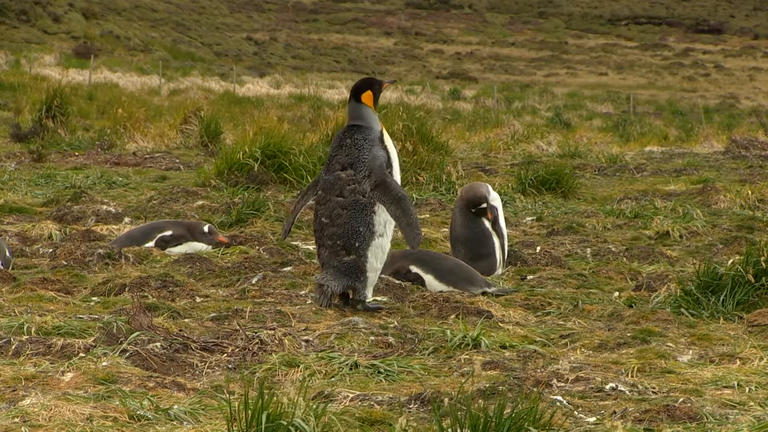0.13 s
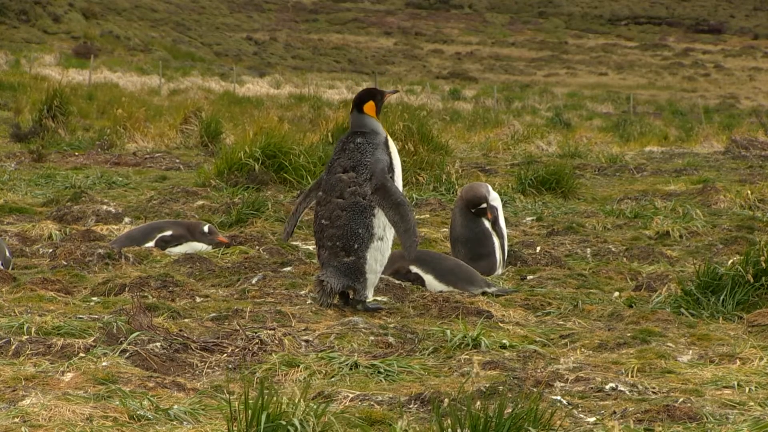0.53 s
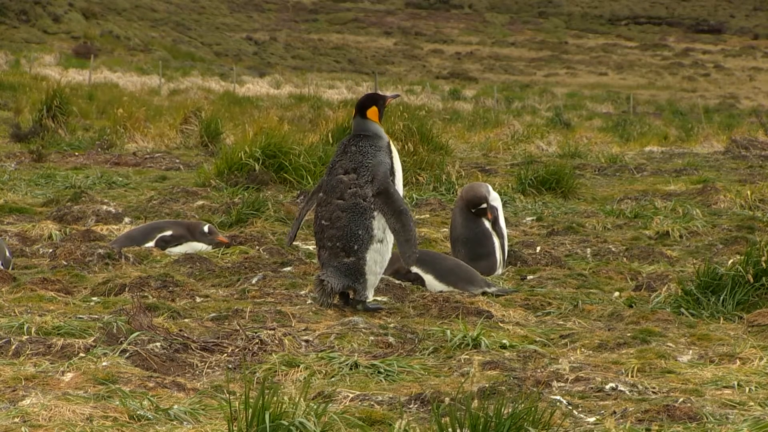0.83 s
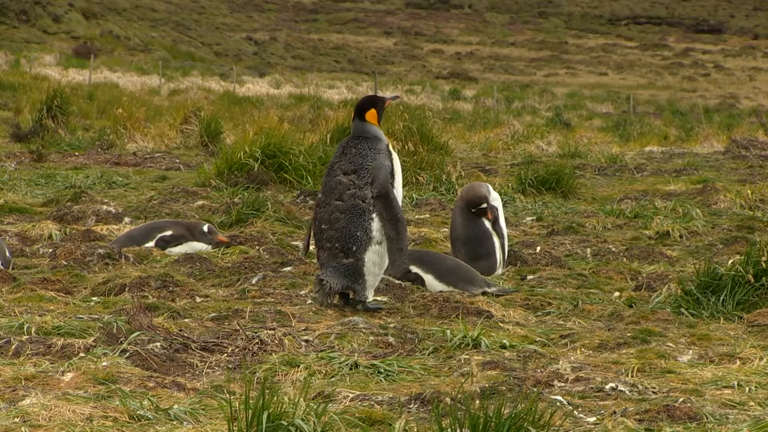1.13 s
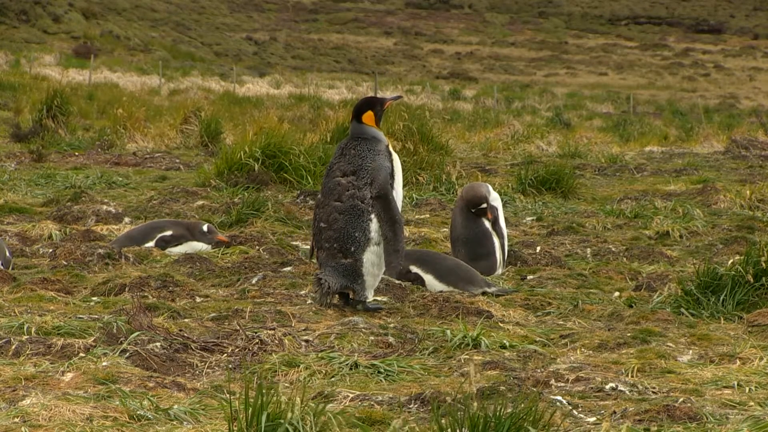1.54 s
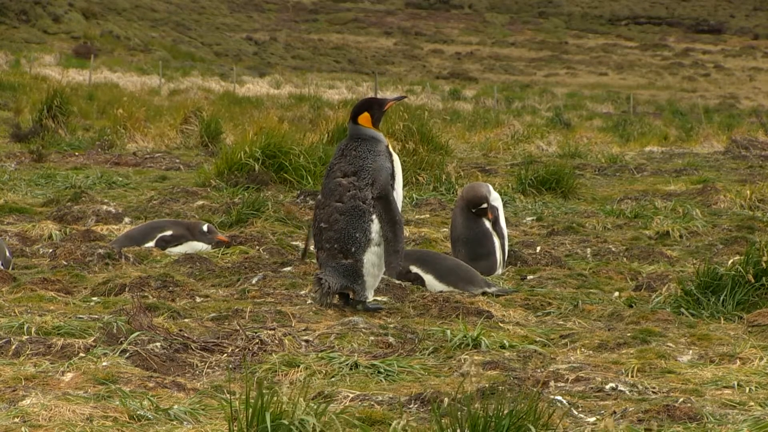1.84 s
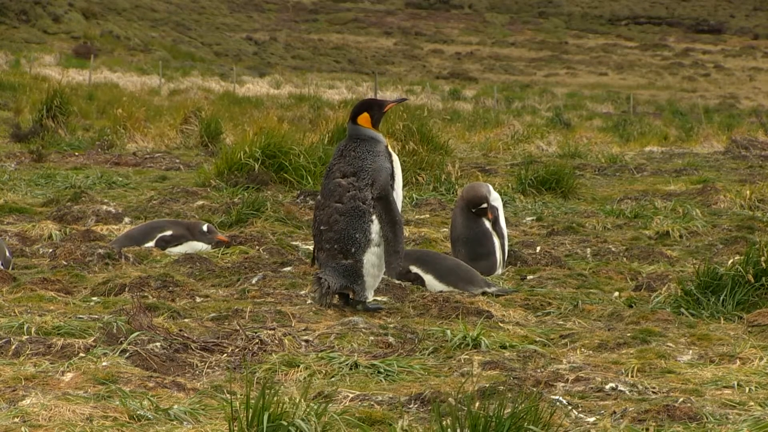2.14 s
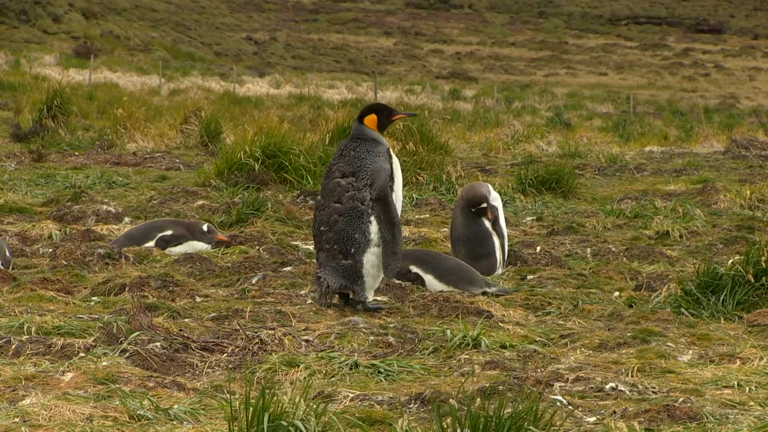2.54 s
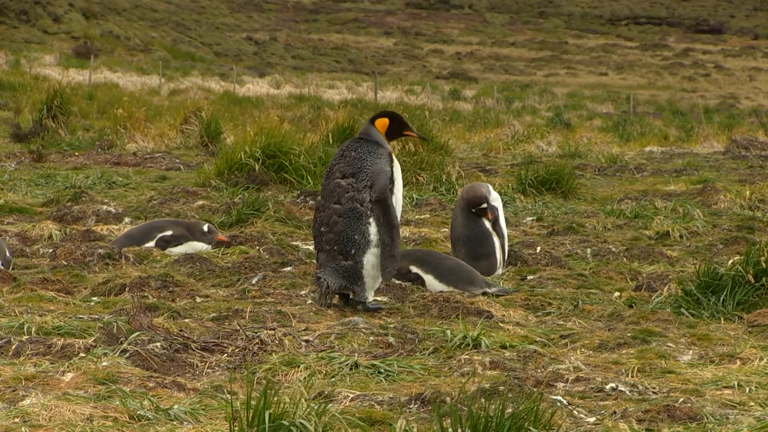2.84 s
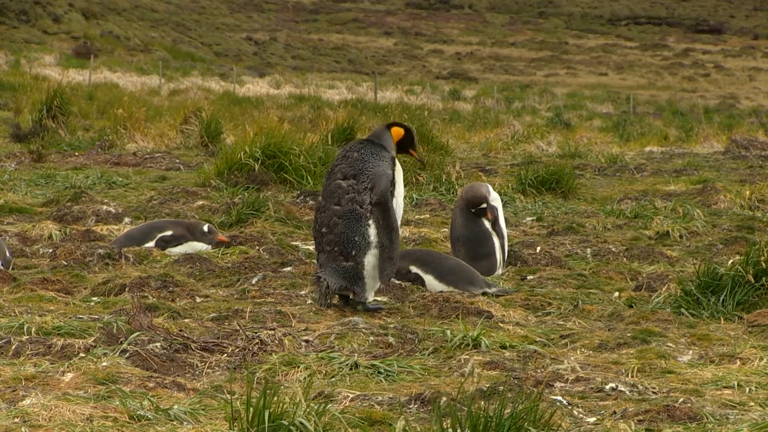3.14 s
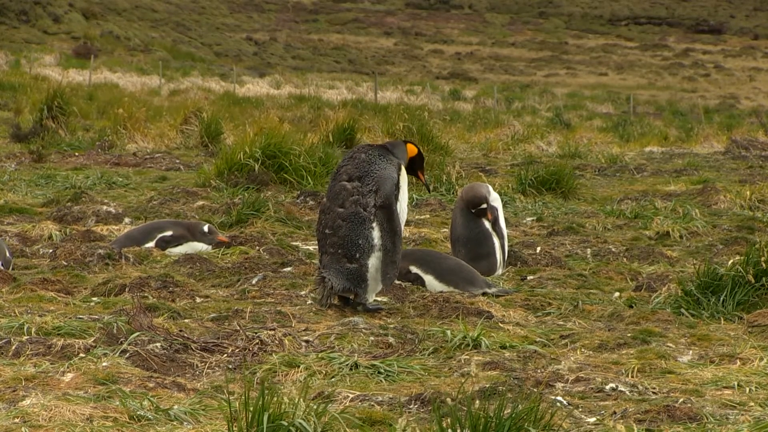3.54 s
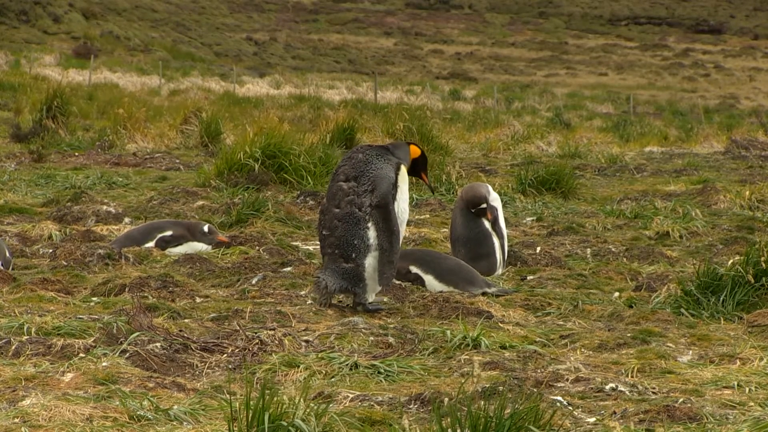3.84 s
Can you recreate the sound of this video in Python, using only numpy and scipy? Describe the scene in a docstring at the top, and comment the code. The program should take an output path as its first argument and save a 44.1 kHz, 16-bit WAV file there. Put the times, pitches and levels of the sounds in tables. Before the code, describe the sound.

A penguin colony outdoors: strong buzzing brays first, then weaker overlapping ones, with squeaky chicks and gliding chirps mostly to the right; low wind swells mid-way and later, bumping the stereo microphones, with almost no echo.

```python
"""Penguins bray in rough, throbbing pulses to the left and right, in a colony on open grassland.
Each bray is a train of pulses and puffs of air coloured by a throat; chicks squawk in stacked partials.
Whistles are gliding tones, croaks are short pulsing tones, and all the voices leave a short noisy tail.
Shaped noise makes the murmur of the far colony, an airy hiss and the wind rumbling in two microphones;
sharp gusts add quick pressure dips."""
import sys
import numpy as np
from scipy import signal
from scipy.fft import rfft, irfft, next_fast_len
from scipy.io import wavfile
from scipy.ndimage import uniform_filter1d

SR = 44100
rng = np.random.default_rng(int(sys.argv[2]) if len(sys.argv) > 2 else 0)


def file_out(sig):
    """Save sig as 16-bit WAV at sys.argv[1]."""
    # one column per channel
    cols = np.atleast_2d(sig).T
    # limit, then scale
    lim = np.clip(cols, -1, 1)
    pcm = np.round(lim * 32767).astype(np.int16)
    wavfile.write(sys.argv[1], SR, pcm)


N = 176400  # samples, 4 s

# Airy hiss, its spectrum before the overall level is set: tone_hz, relative_level_db
HISS_SPECTRUM = [(3000, -9.5), (6000, 2), (8000, -2.5), (10000, -4), (12000, -5.5)]
HISS_DB, HISS_PATCH_DB = -85, 0.87

# Wind strength over time: time_s, level_db (before WIND_LIFT_DB), left_minus_right_db
WIND_STRENGTH = [(0.0, -39.5, 4), (0.169, -44, -0.5), (0.34, -40.5, -0.5), (0.42, -46.5, 5.5),
                 (0.769, -45.5, -6.5), (1.248, -55, 4), (1.48, -50, 11), (1.56, -51.5, -10.5),
                 (1.59, -45, 11.5), (1.68, -38, -2.5), (1.75, -29, 5), (1.79, -38.5, 2.5), (1.83, -35, 1),
                 (1.869, -28.5, 9.5), (1.89, -35, 3.5), (1.978, -29, -1), (2.02, -41, 13.5),
                 (2.101, -60, -5.5), (2.149, -43, 0.5), (2.48, -47.5, -2.5), (2.74, -46, -2),
                 (2.81, -43.5, 3), (2.871, -26, 3.5), (2.909, -41, 1), (3.09, -39, 2.3), (3.22, -44.5, -4),
                 (3.275, -37, 0.3), (3.37, -36.5, -2.5), (3.42, -47, -3), (3.47, -37.5, -4.5),
                 (3.58, -42, -5.5), (3.66, -35.5, 2.5), (3.77, -36, -4), (3.878, -44, 2.5), (4.0, -37, -4)]
# Spectrum of moderate wind, before the level is set: tone_hz, relative_level_db
WIND_SPECTRUM = [(20, -36.5), (32, -21.5), (45, -18), (75, 0.5), (110, 1.5), (200, -6.5), (270, -16),
                 (400, -22), (550, -31.5), (800, -44.5), (1500, -60), (3000, -100)]
WIND_LIFT_DB, WIND_LUMP_DB, WIND_PATCH_DB = 3.5, 3.5, 1.5
# each dB of wind above CALM_DB tilts the spectrum by BRIGHTEN dB per octave around KNEE_HZ
CALM_DB, BRIGHTEN, KNEE_HZ = -42, 0.2, 134

# Sharp gusts: time_s (before BUFFET_LATE_S), peak_db (before BUFFET_TRIM_DB), left_minus_right_db
BUFFET_TIMES = [(1.731, -26, 4), (1.856, -12, 14.5), (1.942, -20, 5), (1.979, -19.5, -5), (2.144, -34, -11),
                (2.861, -28, -0.5), (3.62, -33.5, -3), (3.668, -26, -1)]
BUFFET_S, BUFFET_LATE_S, BUFFET_TRIM_DB = 0.001, 0.00402, -5
BUFFET_ROUND = 0.29  # rounding of the tip, in units of BUFFET_S

# Far colony, its spectrum before the overall level is set: tone_hz, relative_level_db
MURMUR_SPECTRUM = [(290, -23.5), (500, -0.5), (704, -7.5), (944, -5.5), (1050, -3), (1650, -10.5),
                   (2070, -9), (2590, -14.5), (3340, -11), (3680, -19.5), (4180, -23.5), (5180, -28.5),
                   (6730, -47.5), (11400, -120)]
MURMUR_DB, MURMUR_PATCH_DB = -69, 3.5
MURMUR_SAME = 0.78  # likeness of the two channels, 0-1

# Tail of the voices: level, and time to fall by 60 dB
SCATTER_DB, SCATTER_T60_S = -11, 0.08

# Whistles from the left, one list per call: time_s, pitch_hz, level_db, octave_level_db
WHISTLES_ON_LEFT = [
    [(0.295, 4030, -66, -81), (0.345, 3860, -75, -85), (0.381, 4300, -72, -82), (0.419, 4320, -78, -82),
     (0.44, 3583, -79, -92.5)],
    [(0.402, 3770, -78, -99), (0.422, 3600, -71, -72), (0.48, 3550, -80, -83)],
    [(1.2, 3741, -72, -107), (1.222, 3055, -61.5, -100), (1.236, 3653, -61, -74.5),
     (1.254, 3804, -70, -120), (1.266, 3603, -63, -76), (1.288, 2880, -68, -107), (1.336, 3348, -65, -77),
     (1.35, 2830, -68, -107)],
    [(1.125, 3770, -67, -114), (1.143, 3060, -64, -104), (1.165, 3740, -88, -117)],
    [(3.29, 3202, -76, -106), (3.332, 3650, -68, -68), (3.365, 3437, -98.5, -101)],
    [(3.445, 3210, -80, -108), (3.52, 3750, -72, -72.5), (3.58, 3450, -102, -106)],
]
# Whistles from the right, one list per call: time_s, pitch_hz, level_db
WHISTLES_ON_RIGHT = [
    [(0.575, 3586, -72), (0.665, 3673, -74.5), (.73, 3625, -72.5), (.765, 3650, -79), (0.821, 3620, -74),
     (0.87, 3400, -78)],
    [(.73, 2560, -85), (.79, 2680, -84), (.83, 2826, -72.5), (.9, 2630, -67.5)],
    [(1.095, 2920, -72.5), (1.11, 3753, -72)],
    [(1.078, 3780, -77), (1.11, 3930, -69), (1.14, 3750, -74)],
    [(1.3, 3400, -76), (1.35, 3540, -78), (1.4, 3220, -78)],
    [(1.48, 3150, -84), (1.6, 3330, -92), (1.65, 3600, -73), (1.675, 3390, -75.5), (1.7, 3150, -74),
     (1.75, 2880, -68)],
    [(1.682, 3890, -75), (1.738, 3635, -65), (1.765, 3200, -64)],
    [(1.785, 3463, -66), (1.801, 3493, -63.5), (1.815, 3290, -84)],
    [(1.99, 3250, -92), (2.035, 3350, -80), (2.065, 3500, -69.5), (2.1, 3470, -83.5), (2.135, 3080, -75.5),
     (2.18, 2720, -70)],
    [(2.355, 3700, -78), (2.375, 4040, -81), (2.4, 4070, -79), (2.42, 3600, -67), (2.44, 3360, -70)],
    [(2.437, 4250, -82.5), (2.46, 3780, -73), (2.477, 4050, -77), (2.495, 3680, -76)],
    [(2.49, 3428, -72), (2.51, 3471, -81), (2.56, 3100, -70)],
    [(2.89, 3220, -86), (2.902, 3424, -69), (2.92, 3290, -78), (2.964, 3780, -64.5), (2.994, 3400, -71),
     (3.022, 4430, -68), (3.04, 4114, -79), (3.054, 3685, -65.5), (3.07, 3550, -66)],
    [(3.143, 3900, -63), (3.158, 4150, -74), (3.18, 3800, -58.5), (3.195, 3400, -67), (3.215, 3290, -64.5)],
    [(3.55, 3236, -82), (3.574, 3444, -74.5), (3.6, 3150, -74), (3.625, 3340, -71), (3.674, 3059, -76),
     (3.698, 3100, -69.5), (3.72, 2970, -81.5)],
    [(3.79, 3270, -75), (3.812, 3411, -66.5), (3.84, 3550, -77)],
]
WHISTLE_LAG, WHISTLE_EDGE_S = 3.46, 0.0016  # lag in samples, before a factor for each side
OCTAVE_DB = -23.5  # octave of the right whistles, relative to their tone
WAVER = 0.0016  # random pitch drift of whistles and squawks, as a share of pitch

# Short distant croaks from the left: start_s, level_db (before the fade in and out)
CROAK_TIMES = [(.63, -69), (0.674, -63.5), (.723, -67), (.768, -66.5)]
# The two tones of a croak, before the level is set: tone_hz, relative_level_db
CROAK_RESONANCES = [(1060, -4.5), (1980, -3)]
CROAK_S, CROAK_HZ, CROAK_LAG = 0.021, 225, -3.5  # length, pulse rate, left lag in samples

# Chick squawks from the right, one list per call: time_s, pitch_hz, level_db
SQUAWK_CALLS = [
    [(0.402, 815, -63), (0.45, 803, -63.5), (0.5, 766, -65)],
    [(0.508, 688, -65), (0.548, 656, -62), (0.572, 590, -65)],
    [(1.292, 754, -60), (1.302, 727.2, -68), (1.325, 790, -68)],
    [(3.072, 746, -60), (3.132, 708, -60.5), (3.143, 760, -79.5)],
    [(3.217, 616, -65.5), (3.247, 556, -67), (3.268, 550, -81)],
]
# Throat of a chick, before the level is set: tone_hz, relative_level_db
CHICK_THROAT = [(1120, -57), (1800, -42), (2170, -18.5), (2850, -19.5), (3670, -13.5), (4400, -23.5),
                (5180, -21.5), (6000, -25.5), (6730, -28), (8000, -43), (11400, -46.5)]
# Treble tilt, one value per squawk: tilt_db_per_octave
SQUAWK_TILTS = [-7, -8, -3.5, -3, 5]
SQUAWK_LAG, SQUAWK_PAN_DB = 3.76, -2.5  # left lag in samples, left minus right
SQUAWK_EDGE_S, SQUAWK_FLUTTER_DB = 0.0013, 3

# Brays: start_s, length_s, level_db (before swell and throbs), first_pitch_hz, last_pitch_hz,
# throbs_per_s, throb_depth (0-1), sounding_share_of_throb (0-1), roughness (0-1),
# loudest_at (share of length), tilt_db_per_octave, treble_change_db (start to end),
# chest_db, nasal_db, edge_db, ring_db, left_lag_samples
BRAY_CALLS = [(0.002, 0.099, -55.5, 224.6, 222.2, 35, 0.6, 0.58, 0.45, 0.19, 0, -12, -2, 5.5, 6, -6, -7),
              (0.176, 0.3542, -55, 222.9, 203.3, 30.7, 0.9, .76, 0.25, 0.25, 0.5, -18, -4, -4, .1, 8, -3),
              (0.819, .24, -62, 237.5, 215.5, 29, 0.74, 0.77, 0.48, 0.22, -1.1, -12, -9, -2.5, 1, 12, -3.5),
              (1.048, 0.19, -65.5, 229.7, 226.5, 30, 0.9, 0.54, 0.7, 0.18, 4, 2, -6, -2, 7, 7, -3.5),
              (1.293, 0.18, -64.5, 233.2, 222.5, 36, 0.1, 0.54, 0.42, 0.3, 5.5, -3, 5.68, 14, -4, -1, -3.5),
              (1.47, 0.37, -63.5, 230.6, 213.2, 20, 0.4, 0.64, 0.54, 0.72, -4, 3, -1, 6, 0.8, 0.5, -4),
              (1.755, 0.35, -59.5, 227.9, 222.5, 23, 1, 0.38, 0.4, 0.058, -2, -9.5, -2, -1, 1.5, 0, 2.5),
              (2.428, 0.078, -64.5, 234, 220, 21, 0.2, 0.7, 0.77, 0.34, 4, -.1, 5, 4, 4, 8, 4.5),
              (2.518, 0.4, -60, 241.6, 240, 26.5, .97, 0.45, 0.48, 0.66, 1.3, 3, 3.54, 1.5, -1, 7, 4),
              (2.71, 0.18, -58.5, 243, 240.4, 29.5, 0.25, 0.9, 0.25, .45, 0.5, 2, 34.5, -4, -3, 6.5, 3),
              (3.338, 0.21, -72, 227, 229, 15.5, 0.3, .6, 0, 0.52, 13, 7, 1, -1, 6, 10, -3),
              (3.458, 0.19, -68.5, 228.4, 216.3, 25.4, 1, 0.47, 0.14, 0.21, -0.5, 2, -0.95, 11.5, 2, -1, 0.5),
              (3.543, 0.29, -66.5, 216.4, 230.8, 21, 0.07, 0.65, 0.18, 0.92, 5.5, 4, 2, 1.38, 5.5, 11, -3.5),
              (3.8, 0.36, -60.5, 247.4, 238.9, 23, 0.06, .6, 0.31, 0.11, 2, -3, -6, -4, 4.5, 11, -3.5)]
# Throat of an adult, before the level is set: tone_hz, relative_level_db
ADULT_THROAT = [(350, -51), (600, -12.5), (845, -3.5), (1100, -0.5), (1530, -4), (2300, -5), (2650, -6),
                (3130, -5.5), (3700, -8), (3950, -13), (4200, -23.5), (4550, -16.5), (5450, -20.5),
                (5900, -25.5), (8000, -32), (11500, -52)]
# Chest, nasal, edge and ring bands, in that order: centre_hz, width_octaves
THROAT_BANDS = [(500, .35), (1950, 0.46), (3700, 0.13), (4900, 0.3)]
BRAY_RISE_S, BRAY_FALL_S = 0.014, 0.021
BRAY_SWELL_DB, BRAY_SAG_DB = -7, -8  # start and end, relative to the loudest moment
THROB_SOFT, TREBLE_HZ = 0.18, 3900  # softness of each throb's edge, where the changing treble begins
SHIMMER_DB, JITTER = 2, 0.013  # random pulse strength, random pitch drift as a share of pitch

EDGE_HZ = 11950  # upper limit of the whole sound


def gain_of(db):
    """Turns decibels into a gain."""
    return 10 ** (np.asarray(db) / 20)


def evened(x):
    """Scales a sound to an average strength (rms) of 1."""
    return x / np.sqrt(np.mean(x ** 2) + 1e-20)


def drift(shape, width):
    """Slow random wandering: noise averaged over width samples, with rms 1."""
    return evened(uniform_filter1d(rng.standard_normal(shape), width))


def read(points, hz):
    """Reads a spectrum table with pitch on a logarithmic scale."""
    f, value = np.transpose(points)
    return np.interp(np.log(hz + 1), np.log(f + 1), value)


def edges(t, rise, fall):
    """Fades in and out over the span of t."""
    return np.clip(np.minimum((t - t[0]) / rise, (t[-1] - t) / fall), 0, 1)


def add(mix, start_s, sound, lag, pan_db=0):
    """Adds a sound to both channels, the left one lag samples later, by turning phases."""
    size = next_fast_len(len(sound) + 64)
    spectrum = rfft(np.r_[np.zeros(16), sound], size)  # 16 samples of room for an early arrival
    turn = np.exp(-1j * np.pi * np.fft.rfftfreq(size) * lag)  # half the lag on each side
    pair = irfft([spectrum * turn, spectrum / turn], size) * gain_of([[pan_db / 2], [-pan_db / 2]])
    part = mix[:, max(round(start_s * SR) - 16, 0):][:, :size]
    part += pair[:, :part.shape[1]]


def field(size, shape_db, patch_db, wide, same):
    """Stereo noise shaped over pitch and time, with level patches that drift."""
    hop = size // 4
    frames, hz = N // hop + 5, np.fft.rfftfreq(size, 1 / SR)[:, None]
    real, imaginary, patches = rng.standard_normal((frames, len(hz), 2, 3)).T
    patches = uniform_filter1d(patches, wide, 1)  # smooth over pitch
    patches = evened(uniform_filter1d(patches, 6, 2))  # smooth over time
    z = real + 1j * imaginary
    z[1] = same * z[0] + np.sqrt(1 - same ** 2) * z[1]
    z = z * gain_of(shape_db(hz, np.arange(frames) * hop / SR) + patch_db * patches)
    return signal.istft(z, nperseg=size, noverlap=size - hop)[1][:, :N]


def follow(rows):
    """Joins the points of a call into smooth pitch with a slight waver, phase and levels."""
    s, hz, *levels_db = np.transpose(rows)
    t = np.arange(s[0], s[-1], 1 / SR)
    hz = uniform_filter1d(np.interp(t, s, hz), 300, mode="nearest")
    hz = hz * (1 + WAVER * drift(len(t), 200))
    phase = 2 * np.pi * np.cumsum(hz) / SR
    return t, hz, phase, [np.interp(t, s, db) for db in levels_db]


def hiss():
    """Smooth airy hiss: shaped noise, nearly unrelated in the two channels."""
    def tone(hz, t):
        return read(HISS_SPECTRUM, hz) + 0 * t  # steady over time
    return gain_of(HISS_DB) * evened(field(512, tone, HISS_PATCH_DB, wide=5, same=0.1))


def wind():
    """Lumpy noise rumble, unrelated in the two microphones, brighter when it blows harder."""
    s, db, pan_db = np.transpose(WIND_STRENGTH)

    def tone(hz, t):
        octaves = np.clip(np.log2((hz + 1) / KNEE_HZ), -2, 4)
        shape = read(WIND_SPECTRUM, hz) + BRIGHTEN * octaves * (np.interp(t, s, db) - CALM_DB)
        return shape - 10 * np.log10(np.mean(gain_of(2 * shape), 0))  # same power at every moment

    noise = evened(field(1024, tone, WIND_PATCH_DB, wide=3, same=0))
    lumps = uniform_filter1d(rng.standard_normal((2, N)), 900, 1)
    lumps = evened(uniform_filter1d(lumps, 500, 1))
    t = np.arange(N) / SR
    level_db = np.interp(t, s, db + WIND_LIFT_DB) + np.outer([.5, -.5], np.interp(t, s, pan_db))
    return noise * gain_of(level_db) * evened(gain_of(WIND_LUMP_DB * lumps))


def buffets():
    """Sharp gusts: a quick, slightly rounded pressure dip with a small rise on either side."""
    out = np.zeros((2, N))
    distance = np.arange(-441, 441) / SR / BUFFET_S
    distance = np.hypot(distance, BUFFET_ROUND) - BUFFET_ROUND
    dip = (distance - 1) * np.exp(-distance)
    for s, db, pan_db in BUFFET_TIMES:
        start_s = s + BUFFET_LATE_S - 441 / SR  # the dip lies 441 samples in
        add(out, start_s, dip * gain_of(db + BUFFET_TRIM_DB), 0, pan_db)
    return out


def murmur():
    """The far colony as a patchy wash of noise, with its bass rolled off below 500 Hz."""
    def tone(hz, t):
        bass_cut_db = 12 * np.log2(np.maximum(500 / (hz + 1), 1))
        return read(MURMUR_SPECTRUM, hz) - bass_cut_db + 0 * t  # steady over time
    return gain_of(MURMUR_DB) * evened(field(512, tone, MURMUR_PATCH_DB, wide=5, same=MURMUR_SAME))


def scatter(voices):
    """Short diffuse tail from ground, tussocks and bodies: the voices smeared by fading noise."""
    t = np.arange(6000) / SR
    tail = rng.standard_normal((2, 6000)) * gain_of(-60 * t / SCATTER_T60_S) * (t > .002)
    return signal.fftconvolve(voices, tail / np.linalg.norm(tail[0]), axes=1)[:, :N]


def whistle(rows):
    """A gliding, nearly pure tone with its octave."""
    t, _, phase, levels_db = follow(rows)
    octave_db = levels_db[1] if len(levels_db) > 1 else levels_db[0] + OCTAVE_DB
    tone = gain_of(levels_db[0]) * np.sin(phase) + gain_of(octave_db) * np.sin(2 * phase)
    return np.sqrt(2) * tone * edges(t, WHISTLE_EDGE_S, WHISTLE_EDGE_S)


def croak(db):
    """Two tones whose strength jumps up and fades again with each of a few pulses."""
    t = np.arange(0, CROAK_S, 1 / SR)
    tones = sum(gain_of(d) * np.sin(2 * np.pi * (f * t + rng.random())) for f, d in CROAK_RESONANCES)
    pulses = np.exp(-(t * CROAK_HZ % 1) / 0.95)
    return evened(tones * pulses) * np.hanning(len(t)) * gain_of(db)


def squawk(rows, tilt_db):
    """A stack of partials, the low ones held back by the throat, each fluttering on its own."""
    t, hz, phase, (db,) = follow(rows)
    flutter = uniform_filter1d(rng.standard_normal((16, len(t))), 500, 1)
    flutter_db = SQUAWK_FLUTTER_DB * evened(flutter)
    stack = 0
    for k in range(1, 16):
        colour_db = read(CHICK_THROAT, k * hz) + tilt_db * np.log2(k * hz / 3000)
        stack = stack + gain_of(colour_db + flutter_db[k]) * np.cos(k * phase)
    return evened(stack) * gain_of(db) * edges(t, SQUAWK_EDGE_S, SQUAWK_EDGE_S)


def bray(length, db, first_hz, last_hz, throb, depth, share, rough, top, tilt_db, change_db, *bands_db):
    """Uneven pulses and puffs of air pass a throat; the call swells, throbs and sags."""
    t = np.arange(0, length, 1 / SR)
    pitch_hz = np.linspace(first_hz, last_hz, len(t)) * (1 + JITTER * drift(len(t), 300))
    turns = np.cumsum(pitch_hz) / SR
    pulses = np.diff(np.floor(turns), prepend=0) * gain_of(SHIMMER_DB * rng.standard_normal(len(t)))
    puffs = np.exp(-(turns % 1) / 0.86) * rng.standard_normal(len(t))
    drive = (1 - rough) * evened(pulses) + rough * evened(puffs)

    hz = np.fft.rfftfreq(len(t), 1 / SR) + 1
    colour_db = read(ADULT_THROAT, hz) + tilt_db * np.log2(hz / 2000 + .05)
    for (f, octaves), boost_db in zip(THROAT_BANDS, bands_db):
        colour_db = colour_db + boost_db * np.exp(-(np.log2(hz / f) / octaves) ** 2)
    spectrum = rfft(drive) * gain_of(colour_db)

    treble_share = 1 / (1 + (TREBLE_HZ / hz) ** 8)
    low = irfft(spectrum * (1 - treble_share), len(t))
    treble = irfft(spectrum * treble_share, len(t))
    voice = evened(low + treble * gain_of(change_db * (t / length - .5)))

    shut = np.clip((abs(2 * (throb * t % 1) - 1) - share) / THROB_SOFT + .5, 0, 1)
    beat = 1 - depth * shut
    swell_db = np.interp(t / length, [0, top, 1], [BRAY_SWELL_DB, 0, BRAY_SAG_DB])
    return voice * beat * edges(t, BRAY_RISE_S, BRAY_FALL_S) * gain_of(db + swell_db)


def scene():
    """Voices with their tail, the far colony, hiss, wind and sharp gusts."""
    voices = np.zeros((2, N))
    for side, calls in ((-0.97, WHISTLES_ON_LEFT), (1.0, WHISTLES_ON_RIGHT)):
        for rows in calls:
            add(voices, rows[0][0], whistle(rows), side * WHISTLE_LAG)
    for start_s, db in CROAK_TIMES:
        add(voices, start_s, croak(db), CROAK_LAG)
    for rows, tilt_db in zip(SQUAWK_CALLS, SQUAWK_TILTS):
        add(voices, rows[0][0], squawk(rows, tilt_db), SQUAWK_LAG, SQUAWK_PAN_DB)
    for start_s, *settings, lag in BRAY_CALLS:
        add(voices, start_s, bray(*settings), lag)
    background = hiss() + wind() + buffets() + murmur()
    return background + voices + gain_of(SCATTER_DB) * scatter(voices)


def record(dry):
    """Removes everything above EDGE_HZ with a steep filter."""
    low_pass = signal.firwin(511, EDGE_HZ, window=("kaiser", 9), fs=SR)
    return signal.oaconvolve(dry, low_pass[None], "same")


dry = scene()
out = record(dry)
file_out(out)
```